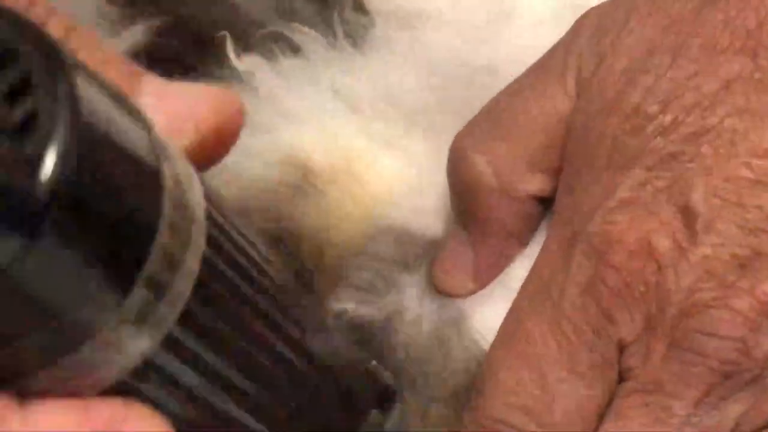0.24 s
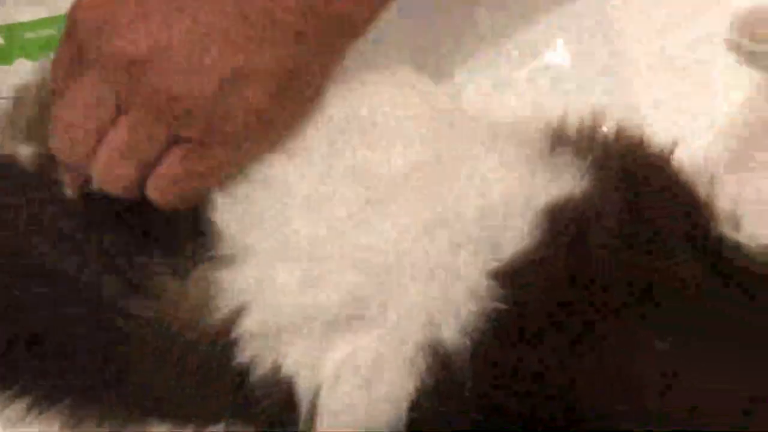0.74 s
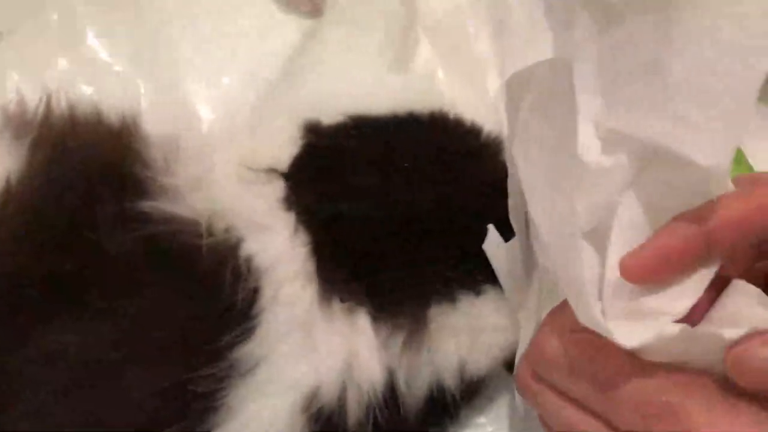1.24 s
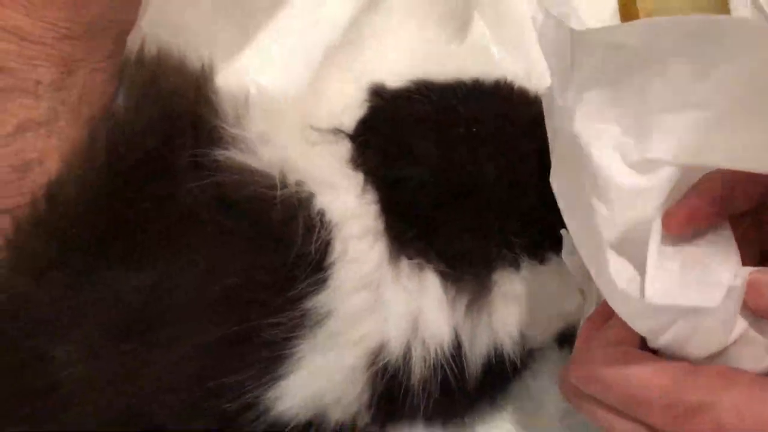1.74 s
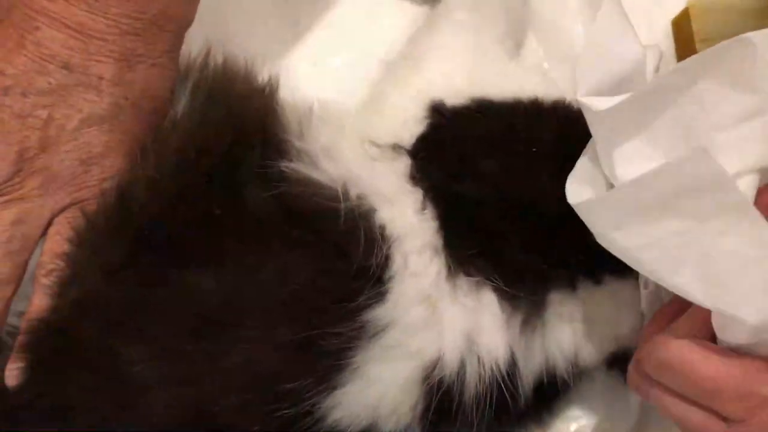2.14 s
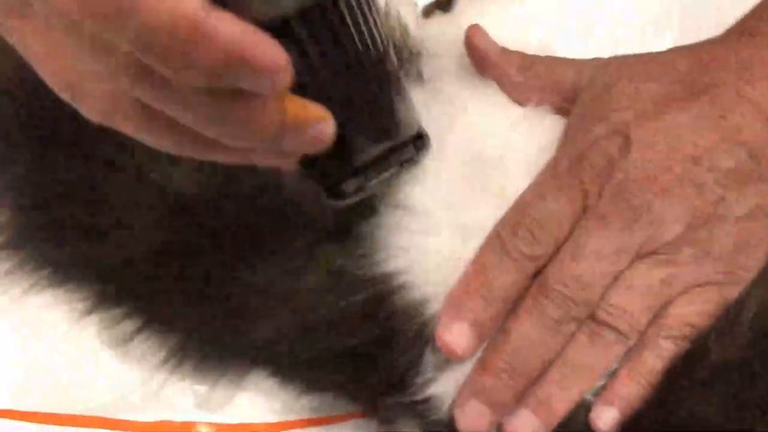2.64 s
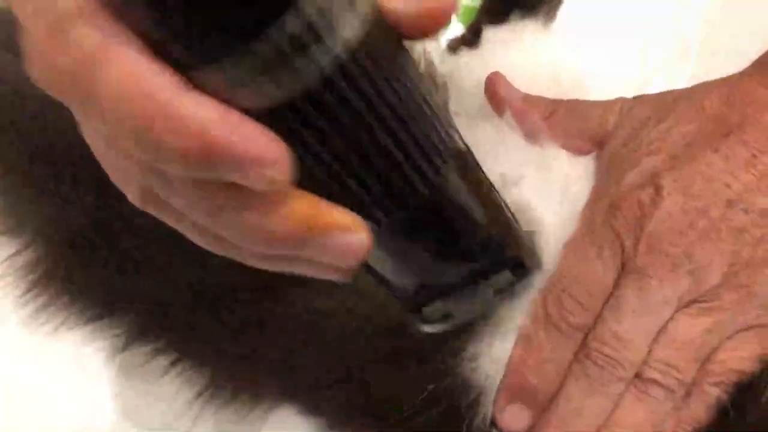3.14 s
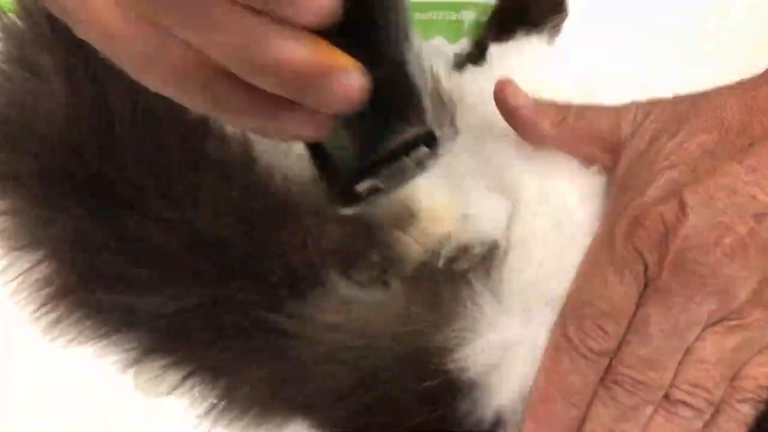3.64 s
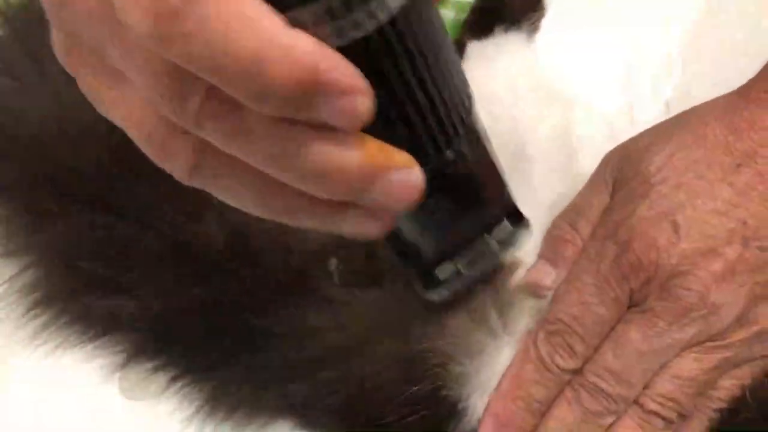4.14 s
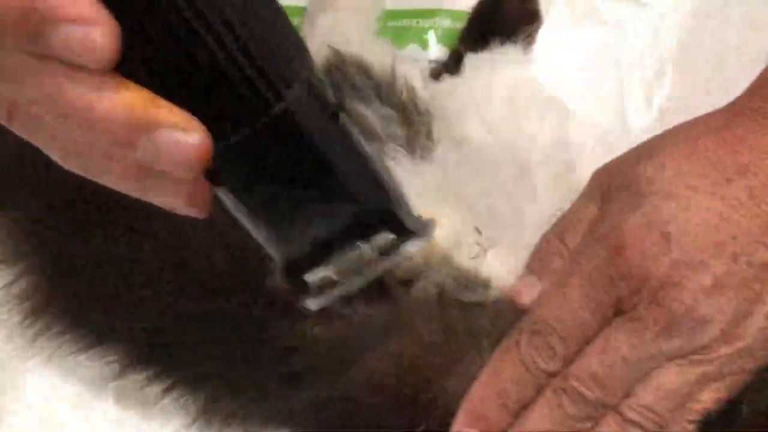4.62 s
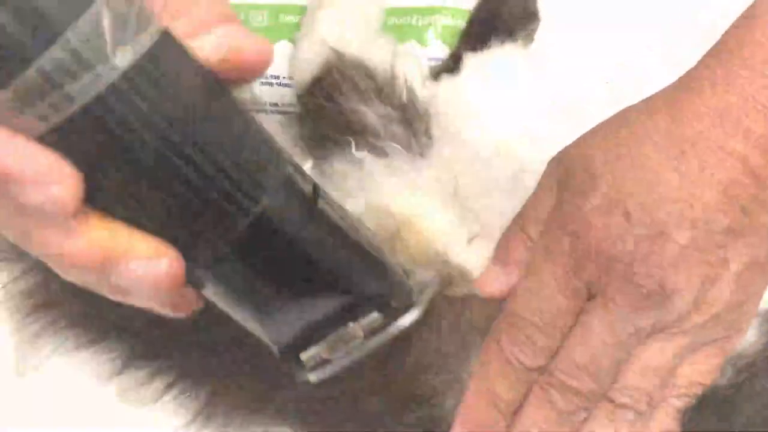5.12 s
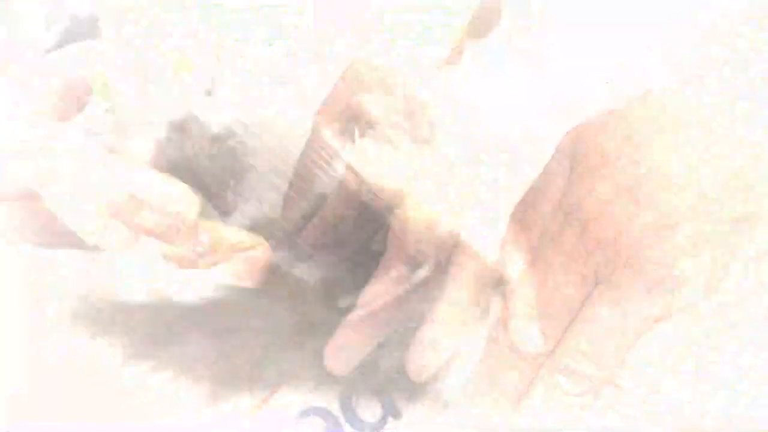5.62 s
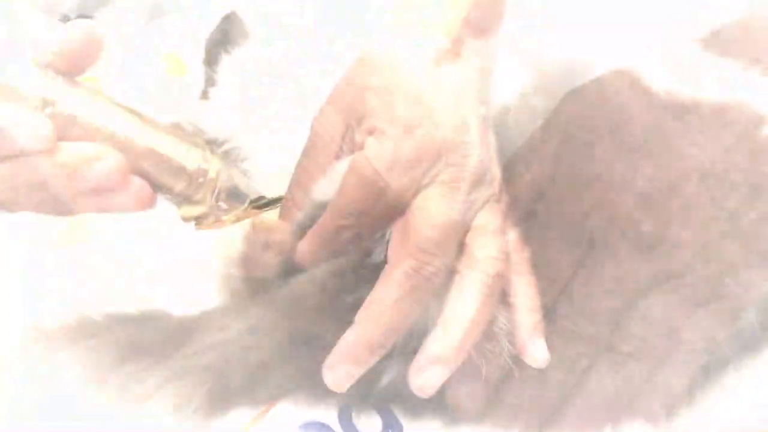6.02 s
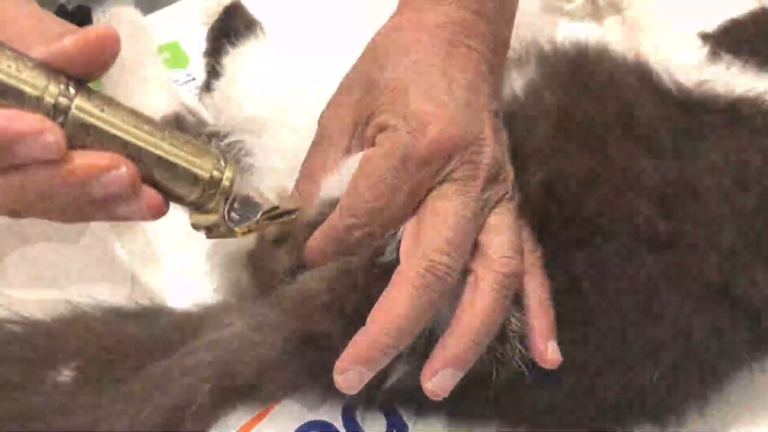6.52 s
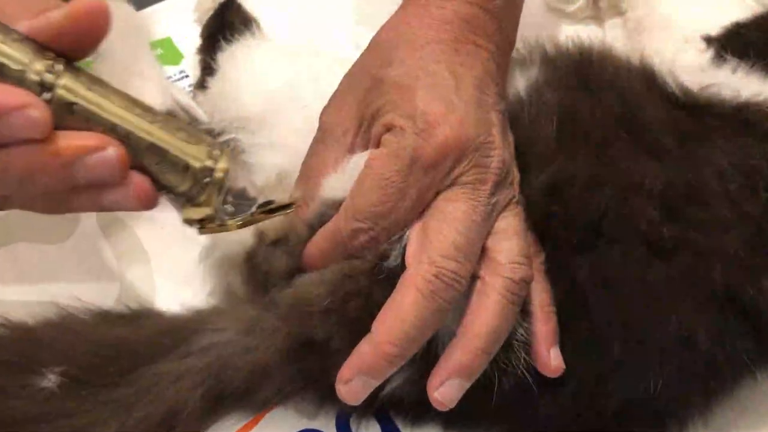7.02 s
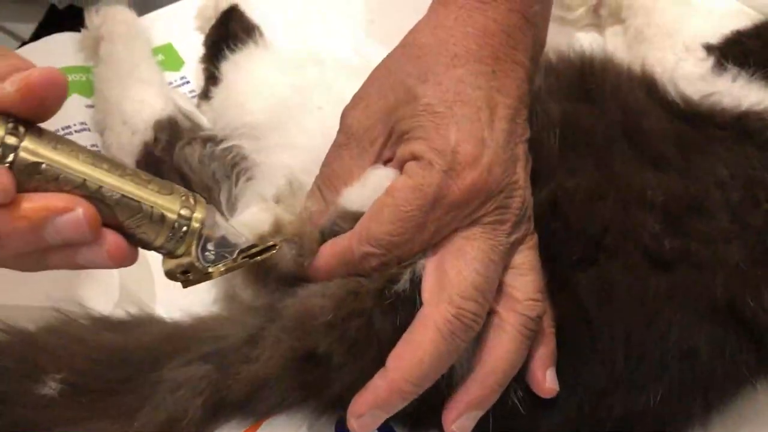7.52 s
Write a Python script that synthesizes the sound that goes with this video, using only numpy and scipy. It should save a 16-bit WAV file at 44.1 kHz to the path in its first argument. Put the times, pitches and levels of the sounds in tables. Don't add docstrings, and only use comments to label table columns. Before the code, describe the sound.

Large clippers rattle and scrape roughly through matted fur over a motor whine, then after a tiny gap a small trimmer buzzes evenly.

```python
import sys
import numpy as np
from scipy import signal
from scipy.fft import rfft, irfft, next_fast_len
from scipy.io import wavfile
from scipy.ndimage import uniform_filter1d

SR = 44100
rng = np.random.default_rng(int(sys.argv[2]) if len(sys.argv) > 2 else 0)


def nominal_scale(level):
    x = np.asarray(level, float) / 20
    return 10 ** x


def int16_out(signal):
    q = np.round(np.clip(np.atleast_2d(signal).T, -1, 1) * 32767)
    wavfile.write(sys.argv[1], SR, q.astype(np.int16))


N = 342657
TIME = np.arange(N) / SR
CUT_OUT, CUT_IN = 5.7775, 5.8251

CLACKS = [
    (.2, 1, .9, .9, .5, .65),
    (.265, .35, .6, .5, .2, .3),
    (.33, .4, .1, .3, .2, .25),
    (.42, -.2, .2, .25, .2, .15),
    (.46, .2, 0, .1, .2, 1),
    (.62, .3, .15, .1, .15, .15),
    (.76, -.9, -.85, -.5, .2, .2),
    (.815, -.3, 0, -.3, .1, .1),
    (.875, .4, 0, .2, 1, .5),
    (.03, .2, .1, .2, .2, .2),
]


def evened(x):
    return x / np.sqrt(np.mean(x ** 2) + 1e-20)


def read(points, hz):
    f, value = np.transpose(points)
    return np.interp(np.log(hz + 1), np.log(f + 1), value)


def curves(rows, t):
    s, *columns = np.transpose(rows)
    return [np.interp(t, s, c) for c in columns]


def wander(shape, length):
    return evened(uniform_filter1d(uniform_filter1d(rng.standard_normal(shape), length), length))


def coloured(db_at):
    count = next_fast_len(N, True)
    spectrum = rfft(rng.standard_normal(count)) * nominal_scale(db_at(np.fft.rfftfreq(count, 1 / SR)))
    return evened(irfft(spectrum, count)[:N])


def bands(hz, centres_hz):
    return np.array([np.interp(np.log(hz + 1), np.log(centres_hz), row) for row in np.eye(len(centres_hz))])


def fade_db(t):
    return -6 * np.exp(-np.maximum(t - CUT_IN, 0) / 0.4)


def room(take):
    # frequency in Hz, level in dB per Hz.
    wash_colours = [
        [(15, -49), (25, -33), (119, 0.5), (152, -8.5), (184, -5), (295, -10.5), (337, -3.5), (385, -16.5),
         (450, -10), (580, -38), (990, -120)],
        [(15, -40), (25, -19), (81, -4), (129, -2.5), (150, -10), (173, -4.5), (220, -7.5), (306, -25),
         (450, -61), (580, -55), (990, -120)],
    ]
    fan_tones = [
        (49, -12, -7),
        (78.5, -12, -9),
        (128.4, -6, 1),
    ]
    rumble = [(0.0, -45.5), (0.67, -49.5), (1.12, -48), (1.3, -51), (1.72, -47), (5.03, -46.5), (5.77, -51)]
    wash = coloured(lambda f: read(wash_colours[take], f) - 40 * (f > 450))
    for hz, *db in fan_tones:
        turn = 2 * np.pi * np.cumsum(hz + 0.33 * wander(N, 4000)) / SR
        wash += nominal_scale(db[take] + 2.0 * wander(N, 3000)) * np.sin(turn)
    rumble_db = -37 + fade_db(TIME) if take else curves(rumble, TIME)[0]
    return evened(wash) * nominal_scale(rumble_db)


def bumps():
    # start in seconds, level in dB, frequency in Hz.
    thuds = [
        (1.08, -36, 125),
        (1.1, -35, 190),
        (1.764, -34, 160),
        (1.768, -38, 75),
        (2.435, -38, 115),
        (3.245, -40, 113),
        (4.015, -40, 124),
        (4.246, -40, 137),
    ]
    out = np.zeros(N)
    for s, db, hz in thuds:
        u = np.maximum(TIME - s, 0) / 0.0051
        swing = np.sin(2 * np.pi * hz * (TIME - s) * np.exp(-.03 * u))
        out += nominal_scale(db) * np.e * u * np.exp(-u) * swing
    return out


def whine():
    # time in seconds, level in dB, octave level in dB.
    whine_levels = [(0, -79, -55), (.2, -55.5, -47), (.5, -54.5, -43.5), (.75, -50, -43.5), (1, -63, -74),
                    (1.27, -62, -51), (1.4, -53.5, -60), (1.9, -50.5, -62), (2.4, -51.5, -78),
                    (2.65, -50, -40.5), (3.1, -52, -45.5), (3.5, -47, -41), (4.2, -49.5, -41),
                    (5, -47, -40.5), (5.4, -55, -43.5), (5.78, -54.5, -54)]
    # time in seconds, motor tone in Hz.
    whine_pitch = [(0, 334), (.5, 338), (.8, 340), (1.3, 335), (1.8, 341), (5.78, 341.5)]
    # start in seconds, end in seconds, frequency in Hz, level in dB.
    whistles = [
        (.7, 1.58, 3038, -52),
        (2.08, 2.38, 3060, -50),
        (.68, .86, 2060, -48),
        (.98, 1.4, 1550, -48),
        (.75, 1.0, 1650, -47),
        (1.72, 2.2, 1800, -51),
        (2.2, 2.45, 1480, -48),
        (-.04, .14, 2120, -46),
        (.27, .39, 3250, -45),
        (.47, .57, 3190, -45),
    ]
    db, octave_db = curves(whine_levels, TIME)
    turn = 2 * np.pi * np.cumsum(curves(whine_pitch, TIME)[0] + 2.2 * wander(N, 1000)) / SR
    tones = nominal_scale(db + 1.1 * wander(N, 900)) * np.sin(turn)
    tones += nominal_scale(octave_db + 1.4 * wander(N, 600)) * np.sin(2 * turn)
    for start, end, hz, whistle_db in whistles:
        on = np.clip(np.minimum(TIME - start, end - TIME) / .04, 0, 1)
        phase = 2 * np.pi * np.cumsum(hz + 8 * wander(N, 1200)) / SR
        tones += on * nominal_scale(whistle_db + 2.5 * wander(N, 900)) * np.sin(phase)
    return np.sqrt(2) * tones


def trimmer_turns(t):
    turn_hz, sag_hz_per_s = 105.73, .12
    sway_hz, sway_s, slowest_s = .1, .48, 6.43
    sway = sway_hz * np.cos(2 * np.pi * (t - slowest_s) / sway_s)
    turns = np.cumsum(turn_hz - sag_hz_per_s * (t - CUT_IN) - sway) / SR + .48
    return turns + .0005 * wander(len(t), 250)


def partials_db(order, hz, low):
    # frequency in Hz, level in dB.
    top_colour = [(3820, -37), (6500, -12.5), (7210, -0.5), (8110, -5.5), (9330, -9), (9720, -9),
                  (11100, -11.5), (12000, -3), (13200, -7.5), (14300, -7.5), (15500, -7.5)]
    # frequency in Hz, level in dB.
    weak_colour = [(300, -25), (530, -20), (640, -24), (850, -18), (1250, -22), (1600, -18), (2900, -22),
                   (6300, -18)]
    # multiple of the turn, level
    # in dB.
    single_lines = [(7, -12), (9, -5), (11, -4), (14, -15), (19, -11), (23, -7), (25, -10), (28, -28),
                    (29, -15), (30, -5), (32, 0), (33, -5), (34, -3), (35, -4), (36, -7), (37, -11),
                    (38, -14), (39, -11), (41, -14), (42, -23), (43, -9), (45, -14), (46, -11), (47, -13),
                    (48, -12), (49, -10), (50, -8), (51, -13), (52, -13), (56, -10), (57, -11), (59, -14),
                    (61, -10)]
    db = read(top_colour, hz) - 12 + 0.46 * rng.standard_normal(len(hz))
    db[low] += (read(weak_colour, hz) - read(top_colour, hz) + 12)[low]
    for k, line_db in single_lines:
        db[order == k] = line_db
    return db


def clack_partials(order, hz, coarse, pressed_db):
    play_shares = [.35, 1, 1, 1, 1, 1, .35, 1, 1, 1]
    reach = bands(hz, [1500, 3600, 6000, 9500, 12500])
    play_turns = 0.0031 * np.array(play_shares)[:, None] * wander((len(CLACKS), len(coarse)), 30)
    lead = nominal_scale(.9 * (pressed_db + 37))
    knocks = 0
    for (place, *strengths), slide in zip(CLACKS, play_turns):
        pressed = lead ** (place == CLACKS[1][0])
        delay = np.exp(-2j * np.pi * np.outer(order, place + slide))
        knocks = knocks + np.dot(strengths, reach)[:, None] * pressed * delay
    return knocks


def trimmer_scrape(t, hz, smooth_db, scrape_db):
    # frequency in Hz, level relative to the partials' colour in dB.
    fizz_colour = [(300, 21), (700, 12), (1100, 0), (2500, 1.5), (3600, -3.5), (4300, 0), (6000, 0),
                   (15700, -9)]
    turns = trimmer_turns(t) if np.ndim(t) == 1 and False else t
    gate = .5 + sum(np.exp(-((turns - place) % 1) / 0.027) for place, *_ in CLACKS)
    fizz = coloured(lambda f: read(fizz_colour, f) + np.interp(f, hz, smooth_db) - 60 * (f < 250))
    return fizz[:len(turns)] * evened(gate) * nominal_scale(scrape_db)


def trimmer():
    layer_levels = [-39, -34.5, -39, -42.5]
    press_shares = [0.05, 0.49, 0.087, 0.37]
    # time in seconds, ring of the blade in dB.
    pressure = [
        (5.84, -44.5),
        (6.06, -43.5),
        (6.18, -39.5),
        (6.45, -38),
        (6.6, -36),
        (6.85, -35.5),
        (7.02, -37),
        (7.2, -34),
        (7.45, -36),
        (7.77, -37),
    ]
    t = TIME[round(CUT_IN * SR):]
    coarse = t[::256]
    turns = trimmer_turns(t)
    order = np.arange(3, 150)
    hz = order * 105.6
    low = hz < 6400
    db = partials_db(order, hz, low)
    smooth_db = uniform_filter1d(db, size=5)
    ring = -np.imag(signal.hilbert(np.log(nominal_scale(smooth_db))))

    pressed_db = curves(pressure, coarse)[0] - fade_db(coarse)
    knocks = clack_partials(order, hz, coarse, pressed_db)
    strength = np.sqrt((abs(knocks) ** 2).mean(1))
    strength[~low] = uniform_filter1d(strength, size=9)[~low]
    swell = (abs(knocks) / strength[:, None] + 1e-3) ** 0.2
    phase = (ring + .3 * rng.standard_normal(len(hz)))[:, None] + np.unwrap(np.angle(knocks))

    drift_db, drift = wander((2, len(hz), len(coarse)), 11) * (np.minimum(hz, 9000) / 8000)[:, None]
    shares = bands(hz, [1800, 3540, 6470, 9200])
    gains_db = np.outer(press_shares, pressed_db - layer_levels[1])
    gains_db += np.array(layer_levels)[:, None] + fade_db(coarse)
    gains_db -= 10 * np.log10(shares ** 2 @ nominal_scale(2 * db) / 2)[:, None]
    heights = swell * nominal_scale(db[:, None] + 2.9 * drift_db + shares.T @ gains_db)
    phase = phase + .3 * drift
    tones = sum(np.interp(t, coarse, a) * np.cos(2 * np.pi * k * turns + np.interp(t, coarse, p))
                for k, a, p in zip(order, heights, phase))
    scrape = trimmer_scrape(turns, hz, smooth_db, layer_levels[1] + fade_db(t) - 13)
    return np.append(np.zeros(N - len(t)), tones + scrape)


def throb_db():
    # time of the catch in seconds, parting time in seconds, loss in dB.
    hollows = [(.1,.04,2),(.212,0.074,4.5),(.385,0.075,7),(.461,0.055,4),(.51,.03,4),(.665,0.068,5),(1.779,0.036,7),
               (1.889,0.035,3.5),(1.988,0.024,7),(2.116,0.035,4),(2.225,0.04,5),(2.331,0.045,4),(2.504,0.062,3.5),
               (2.628,0.093,4),(2.729,0.044,5.5),(2.829,0.043,3),(3.07,0.072,3),(3.197,0.063,5),(3.291,0.045,7),
               (3.322,.02,1.5),(3.412,0.065,5),(3.509,0.036,7),(3.626,0.056,4),(3.7,.05,1.5),(4.086,0.16,3),
               (4.19,0.056,5.5),(4.309,0.077,3.5),(4.412,0.034,4),(4.512,0.035,2),(4.96,0.037,2),(5.065,0.022,1.5),
               (5.38,0.12,3.5),(5.498,0.069,4),(5.612,0.056,3),(5.716,0.039,-1.5)]
    return -sum(db * np.exp(-((TIME - s) / np.where(TIME < s, parting, 0.008)) ** 2)
                for s, parting, db in hollows)


def burst_db(t):
    # time in seconds, half length in seconds, swell in dB.
    tufts = [(.05, 0.024, 8), (0.177, 0.033, -14), (0.258, .04, -1), (.44, .04, -6), (0.53, 0.027, 2),
             (.64, .015, -3), (1.02, .025, 5.5), (1.206, .015, 6), (1.74, .02, 6), (1.91, .02, 1),
             (2.645, 0.027, 3.5), (2.745, 0.014, 5), (2.9, .06, 1), (3.11, 0.027, 4), (3.225, .025, 3),
             (3.33, .015, 6), (3.43, 0.016, 7), (3.535, 0.023, 4), (3.62, 0.014, 2), (3.69, 0.037, -3),
             (3.886, 0.05, 5.5), (4.1, .015, 4), (4.207, .02, 4), (4.32, .02, -2), (4.44, .03, 2),
             (4.703, 0.032, 1), (4.87, .015, 1), (5.05, .015, -12), (5.4, 0.027, -3), (5.51, .02, -1),
             (5.65, 0.014, 0), (5.687, .01, 4)]
    return sum(db * np.exp(-((t - s) / half) ** 2) for s, half, db in tufts)


def flicker_db():
    # time in seconds, gain in dB.
    humps = [(0.0537, 8), (0.0802, 4.0), (0.1281, 4.0), (0.19, 2), (0.2, 7), (0.3837, 3.5), (0.4476, 6),
             (0.6137, 4.5), (0.6968, 4.0), (0.8692, 3), (1.2424, -1), (1.2968, 6), (1.3379, 4.0),
             (1.477, 4.0), (1.6323, 3.5), (1.8696, 6), (1.9917, 9), (2.0511, 3.5), (2.3313, 6),
             (2.3878, 7), (2.4599, -1), (2.5197, 10), (2.5859, 11), (2.7273, 6.0), (2.8453, 7),
             (3.1116, 3), (3.149, 5.0), (3.1791, 11), (3.2617, 12), (3.3531, 4.5), (3.3877, 6),
             (3.4239, 7), (3.4571, 7), (3.5541, -1), (3.5876, 7), (3.6194, 15), (3.7755, -4), (3.8943, 7),
             (4.1539, 4.5), (4.2063, 4.0), (4.278, 5.0), (4.2998, 6), (4.3248, 7), (4.3675, 4.0),
             (4.4032, 12), (4.4482, 5), (4.497, 8), (4.5836, 5), (4.617, 3.5), (4.7091, 3.5),
             (4.8559, 16), (4.8812, 5.0), (4.9692, 5), (5.0022, 7), (5.0426, 2), (5.0779, 5), (5.3515, 0),
             (5.4488, 4), (5.4724, 13), (5.5003, 4.5)]
    # time in seconds, loss in dB.
    dips = [(0.0196, 7), (0.0614, 5.0), (0.172, 8), (0.1955, 24), (0.5308, 8), (0.6524, 5.5),
            (0.7011, 5.0), (0.8649, 12), (1.2248, 4.5), (1.3313, 4.0), (1.5244, 8), (1.5791, 9),
            (1.5887, -1), (1.6153, 7), (1.8046, 1), (1.9829, 4.5), (2.1176, 9), (2.4004, 7), (2.4079, 7),
            (2.4514, 4.5), (2.4778, 4.5), (2.5826, 7.0), (2.7094, 9), (3.0635, 4.0), (3.1573, 4.5),
            (3.2519, 5.0), (3.2833, 4.0), (3.3785, 7), (3.4029, 8), (3.4623, 5.0), (3.583, 4.5),
            (3.5954, 5.5), (3.6477, 3), (3.7865, 1), (3.8877, 7.0), (4.0041, 5.0), (4.1767, 10),
            (4.2142, 6.0), (4.3037, 4.5), (4.3631, 6.0), (4.3954, 3), (4.4554, 6.5), (4.4831, 7),
            (4.5155, 6), (4.564, 6), (4.597, 13), (4.6333, 4.0), (4.7857, 9), (4.8736, 11), (4.8944, 4),
            (4.9398, 7), (4.9939, 7), (5.0606, 9), (5.095, 4.0), (5.1204, 8), (5.1418, 6), (5.327, 7),
            (5.4577, 7), (5.5585, 5.0), (5.6392, 5.0)]
    s, db = np.vstack([humps, np.multiply(dips, [1, -1])]).T
    hump = np.exp(-(np.arange(-400, 401) / SR / 0.0013) ** 2)
    return signal.oaconvolve(np.bincount(np.round(s * SR).astype(int), db, N), hump, "same")


def all_slips():
    # time in seconds, snap in dB, lasting bite in dB, sag just before in dB.
    clear_slips = [(0.0539, 19, -11, 15), (0.131, 27, -6.5, 7), (0.1725, 24, -1.5, 0),
                   (0.2554, 21, -8.5, 9), (0.461, 23, -5.5, 12), (0.5095, 22, -5.5, 8),
                   (0.5345, 17, -1.5, -4), (0.676, 19, -3, 8), (0.6934, 6, 3.5, 5), (0.866, -2, 3, -1),
                   (0.9239, 1, 2, 7), (1.2262, 8, 0.5, 6), (1.729, 7, -0.5, 8), (2.0324, 17, -3, 10),
                   (2.8525, 14, -1, 6), (2.9777, 17, -2, 6), (3.3228, 12, 3.5, 3), (3.368, 11, -0.5, 7),
                   (3.8902, 12, -4, 5), (4.3541, 11, -5, 4), (4.4728, 11, -4, 1), (4.546, 11, -3, 6),
                   (4.597, 8, 2.5, 5), (4.7906, 13, -3, 3), (4.8669, 8, 2, 14), (4.9398, 7, -1.5, 10),
                   (5.0126, 8, -2.5, 12), (5.131, 0, 4, 5), (5.6472, -2, 4, -4), (5.6791, -3, -2, 10)]
    # time in seconds, snap in dB, sag just before in dB.
    ticks = [(.1057,5,-1),(.15,10,4),(.192,10,0),(.386,16,4),(.404,2,9),(.4374,15,1),(.4958,8,-1),(.611,-1,3),
             (.6454,9,7),(.841,12,6),(1.0061,4,5),(1.0525,4,5),(1.3244,7,3),(1.3598,7,6),(1.4077,10,5),
             (1.4466,5,4),(1.4965,6,7),(1.5254,9,1),(1.5808,12,1),(1.61,2,7),(1.7794,15,8),(1.8896,11,8),
             (1.957,5,5),(2.0113,13,5),(2.0951,3,13),(2.2129,-2,8),(2.3072,4,9),(2.3316,8,10),(2.3865,5,11),
             (2.4783,1,6),(2.5042,0,4),(2.5596,5,0),(2.606,1,5),(2.6284,8,5),(2.6993,16,8),(2.7292,8,8),
             (2.829,14,5),(3.1522,10,8),(3.1971,7,2),(3.2914,13,4),(3.3922,16,3),(3.4126,6,3),(3.458,-1,4),
             (3.5089,16,3),(3.5862,1,7),(3.6257,13,6),(4.0622,4,4),(4.0861,11,11),(4.1664,11,7),(4.1904,7,8),
             (4.2827,9,10),(4.3091,8,3),(4.4119,18,3),(4.4448,1,0),(4.4962,9,7),(4.558,10,3),(5.3497,-4,5),
             (5.3802,16,7),(5.4755,8,13),(5.7164,11,14)]
    return np.vstack([clear_slips, np.insert(ticks, 2, 0, axis=1)]).T


def chatter_db():
    s, snap, bite, sag = all_slips()
    out, t = np.zeros(N), np.arange(SR // 4) / SR
    for change_db, tau, flip in ((snap, .004, 1), (bite, .04, 1), (-sag, .012, -1)):
        train = np.bincount(np.round(s * SR).astype(int), change_db, N)[::flip]
        out += signal.oaconvolve(train, np.exp(-t / tau))[:N][::flip]
    return uniform_filter1d(uniform_filter1d(out, size=130), size=130)


def tooth_scrape():
    strokes = (rng.random(N) < 260 / SR) * np.minimum(rng.exponential(1, N), 2.5)
    decay = np.exp(-1 / (0.00033 * SR))
    shake = evened(signal.lfilter([1], [1, -decay], uniform_filter1d(strokes, 80)))
    teeth = rng.standard_normal(N) * nominal_scale(1.3 * np.minimum(rng.exponential(1, N), 4))
    slips_db, throbs_db = chatter_db() + flicker_db(), throb_db()

    play = evened(uniform_filter1d(uniform_filter1d(strokes - strokes.mean(), size=1500), size=1500))
    stroke = uniform_filter1d(1.3 - 2.6 * (np.cumsum(79 + 7 * play) / SR % 1), size=60)

    # share of slips, share of throbs, shake dB, share of stroke
    depths = ((0.6, 0.1, 1.3, .7), (0.57, 0.42, 1.1, 1.5), (0.67, 0.37, 0.58, 1.6), (0.81, 1.88, 1.4, 1.5))
    return [evened(teeth * nominal_scale(db * np.minimum(shake, 2.6))) * nominal_scale(a * slips_db + b * throbs_db + c * stroke)
            for a, b, db, c in depths]


def housing_db(hz, t, away):
    # frequency in Hz, level in dB per Hz.
    facing = [(300, -82), (400, -24.5), (620, -17), (800, -13), (1190, -17), (1500, -9.5), (2370, -12.5),
              (3300, -4), (4600, -3.5), (5500, -5.5), (7800, -11.5), (10400, -16.5), (15700, -15)]
    # frequency in Hz, level in dB per Hz.
    turned = [(240, -51), (400, -18.5), (536, -17.5), (587, -10), (875, -4.5), (1170, -10), (1520, -7.5),
              (2490, -5.5), (3650, 6), (4500, -10), (5250, -5.5), (5970, -13.5), (8760, -16), (15700, -7)]
    # frequency in Hz, width in Hz, gain in dB.
    shell_modes = [(946, 120, 3.5), (3080, 46, 5), (8750, 750, 6.5), (11920, 1100, 4.5)]
    # time in seconds, lower mode in Hz, upper mode in Hz.
    grip = [(0, 1420, 3340), (.55, 1390, 3470), (.9, 1570, 3600), (1.3, 1520, 3420), (1.8, 1800, 3580),
            (2.3, 1800, 3700), (2.55, 1500, 3600), (3.8, 1420, 3420), (4.6, 1480, 3540), (5.78, 1500, 3500)]
    colour_db = np.outer(read(facing, hz), 1 - away) + np.outer(read(turned, hz), away)
    colour_db += sum(db / (1 + ((hz - f) * 2 / wide) ** 2) for f, wide, db in shell_modes)[:, None]
    for mode_hz, wide, db in zip(curves(grip, t), (150, 420), (6.5, 7 + .6 * burst_db(t))):
        colour_db += db / (1 + ((hz[:, None] - mode_hz) * 2 / wide) ** 2)
    streaks = wander((len(hz), len(t)), 25) * np.exp(-hz / 6000)[:, None]
    patches = evened(uniform_filter1d(wander((len(hz), len(t)), 20), 15, axis=0))
    return colour_db + 2.5 * streaks + .9 * patches - 60 * (hz < 380)[:, None]


def clippers():
    # time in seconds, how far turned from the microphone (0-1).
    turning = [
        (0, 0.6),
        (.66, 0.08),
        (.72, 0.63),
        (1.4, 0.92),
        (2.4, 1),
        (2.55, 0.25),
        (3.5, 0.28),
        (4.5, 0.41),
        (5.78, 0.45),
    ]
    # time in seconds, nearness as housing level in dB, bite of the teeth in dB.
    work = [(0.0, -30.5, -12), (0.18, -32, -3), (0.28, -29.5, 0), (0.42, -32.5, -4), (0.55, -29.5, -10),
            (0.74, -33, 2), (1.0, -35.5, -4), (1.46, -38.5, -3.5), (1.72, -35.5, 0), (2.3, -36, 1.5),
            (2.65, -31.5, -4.5), (2.9, -29, -11.5), (3.5, -31.5, -4.5), (3.78, -30.5, 5.5), (4.02, -31, 2),
            (4.6, -30.5, -3.5), (5.22, -31, 3), (5.77, -36, -12)]
    # offset in dB, share of the bite (ratio), gain when turned away in dB.
    layer_mix = [
        (0.5, 0.0097, 2),
        (-5, 0.36, 0),
        (-2.5, 0.18, 3),
        (5, 0.36, -5),
    ]
    tuft_shares = [0.11, 0.98, 0.044, 0.067]
    hz, t, layers = signal.stft(tooth_scrape(), SR, nperseg=1024, noverlap=768)
    away = curves(turning, t)[0]
    colour_db = housing_db(hz, t, away)
    near_db, bite_db = curves(work, t)
    levels_db = [near_db + db + share * bite_db + turned_db * away + tuft * burst_db(t)
                 for (db, share, turned_db), tuft in zip(layer_mix, tuft_shares)]
    out = 0
    for layer, share, db in zip(layers, bands(hz, [1800, 3500, 6470, 12050]), levels_db):
        shape = share[:, None] * nominal_scale(colour_db)
        out = out + layer * shape / np.sqrt((shape ** 2).mean(0)) * nominal_scale(db)
    return signal.istft(out, SR, nperseg=1024, noverlap=768)[1][:N]


def split(x):
    # time in seconds, low edge in Hz, high edge in Hz.
    partings = [
        (.342, 5500, 7000),
        (1.084, 14200, 15500),
        (1.548, 8900, 10300),
        (2.361, 4200, 5800),
        (2.361, 9200, 12200),
        (4.01, 5800, 9000),
    ]
    out = np.zeros(N)
    for s, low_hz, high_hz in partings:
        at = slice(round((s - .023) * SR), round((s + .023) * SR))
        sos = signal.butter(6, [low_hz, high_hz], "band", fs=SR, output="sos")
        band = signal.sosfiltfilt(sos, x[at][::-1])
        out[at] += .7 * band * np.sqrt(np.hanning(len(band)))
    return np.outer([1, -1], out)


def scene():
    first = (clippers() + whine() + room(0) + bumps()) * (TIME < CUT_OUT)
    second = (trimmer() + room(1)) * (TIME >= CUT_IN)
    return first + second + split(first)


def band_limit(x):
    return signal.sosfilt(signal.butter(12, 17020, fs=SR, output="sos"), x)


def record(dry):
    edge = signal.firwin(1023, 15800, window=("kaiser", 9), fs=SR)
    return band_limit(signal.oaconvolve(dry, edge[None], "same"))


dry = scene()
out = record(dry)
int16_out(out)
```